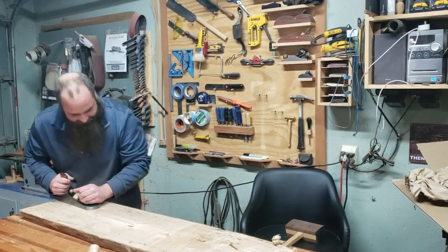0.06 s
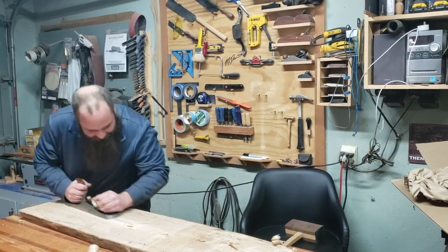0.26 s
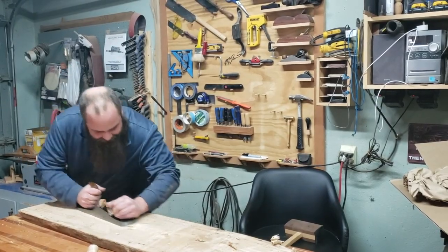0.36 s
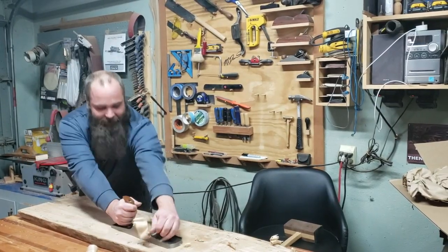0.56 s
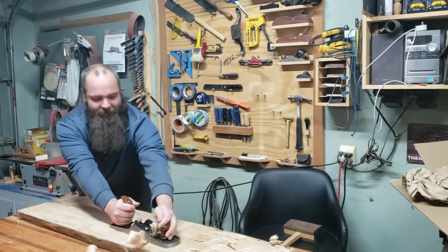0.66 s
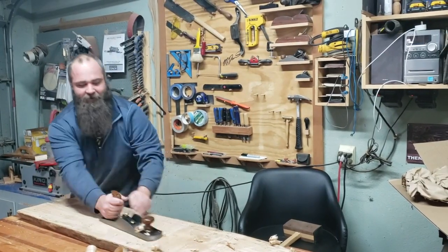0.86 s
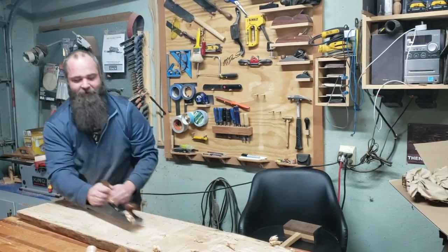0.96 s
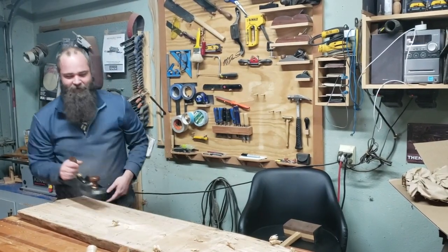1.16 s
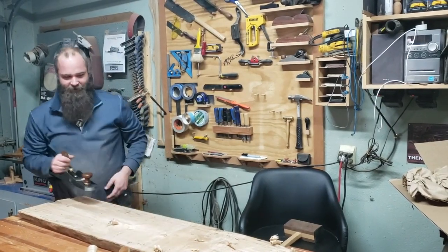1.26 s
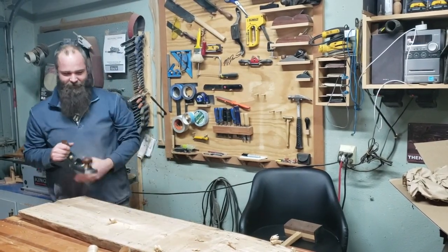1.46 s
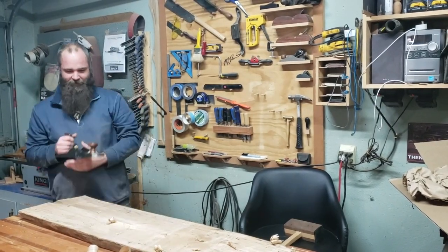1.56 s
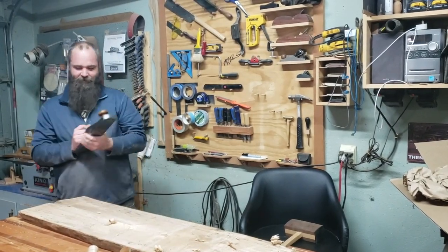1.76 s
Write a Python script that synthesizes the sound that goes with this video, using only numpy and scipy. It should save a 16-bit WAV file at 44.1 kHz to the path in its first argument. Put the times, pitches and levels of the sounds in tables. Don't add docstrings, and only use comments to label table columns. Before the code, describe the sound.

One quick shaving stroke of a hand plane on wood, hissing and speeding up, ends in a clunk; softer knocks and faint rubbing follow over a low fan hum, in stereo in a small room.

```python
import sys
import numpy as np
from scipy import signal
from scipy.fft import rfft, irfft, next_fast_len
from scipy.io import wavfile
from scipy.ndimage import map_coordinates

SR = 44100
rng = np.random.default_rng(int(sys.argv[2]) if len(sys.argv) > 2 else 0)


def amplitude_ratio(level_db):
    exponent = np.asarray(level_db, float) / 20
    return 10 ** exponent


def digitize_waveform(pressure):
    field = np.atleast_2d(pressure).T
    bounded = np.clip(field, -1, 1)
    quanta = np.round(bounded * 32767).astype(np.int16)
    wavfile.write(sys.argv[1], SR, quanta)


N = 79380
T = np.arange(N) / SR

# time in seconds, chatter rate in Hz, chatter level in dB,
# shaving hiss level in dB, sole rumble level in dB.
PLANE_STROKE = [
    (0, 193, -75.5, -96, -38),
    (0.059, 217.5, -42, -58, -35.5),
    (0.179, 299.4, -49, -38, -32.5),
    (.3, 343.1, -29.5, -22, -23),
    (.335, 761, -22, -20, -36),
    (.36, 960, -19, -21.5, -37),
    (.41, 1024, -13, -20.5, -38),
    (.45, 1600, -12.5, -24.5, -44.5),
    (0.477, 1758, -27.5, -24, -25),
]
# frequency in Hz, level in dB.
SHAVING_COLOUR = [(300, -32), (700, -5.5), (1500, -3), (2300, -5), (3300, -5.5), (5500, -11), (8500, -9),
                  (15800, -8.5)]
# frequency in Hz, level in dB.
SOLE_COLOUR = [(60, -34.5), (120, -15), (300, -4), (480, -3), (680, 4), (900, -5.5), (1500, -6),
               (4000, -32)]
# centre in Hz, width in Hz, level in dB.
BENCH_MODES = [(122.7, 4.9, -2.5), (170.3, 10, 0), (218, 22, -7.5), (254.5, 18, 1.5), (328.3, 17, -3),
               (1600, 38, -3.5), (468.4, 18, -19), (544.3, 13, -0.5), (816, 30, -17.5), (878, 42, -5.5),
               (944, 30, -15.5), (1236.7, 40, -2), (1423, 31, -13.5), (1834, 110, 0.5)]
# start in seconds, level in dB, contact length in seconds, rattle rate in Hz,
# looseness of that rate from 0 to 1.
THUMP_EVENTS = [(.09, -33, 0.048, 119.5, 0.1), (0.16, -27.5, 0.022, 596, 0.05),
                (0.52, -16, 0.054, 865, 0.13), (0.52, -16.5, .075, 545, .1), (.53, -24.5, 0.05, 150, .2),
                (.55, -18.5, 0.058, 246, 0.26), (.555, -18.5, 0.042, 950, .15), (.54, -19, .1, 400, .25),
                (0.63, -56, 0.019, 872, 0.17), (0.86, -26.5, 0.058, 122.5, 0.03),
                (0.83, -25, 0.049, 167.4, 0.14), (0.84, -37.5, 0.052, 943, .05),
                (.86, -28.5, 0.049, 450, 0.4), (.91, -27.5, 0.071, 123, 0.03), (.93, -26.5, 0.058, 165, .1),
                (0.702, -39.5, .1, 136, 0.15), (0.5, -21, .065, 1350, 0.3), (0, -38, 0.06, 158, 0.37),
                (0.918, -28.5, 0.048, 328, .06), (.925, -30, 0.091, 258, .05), (.927, -25, 0.016, 540, .08),
                (1.022, -31.5, 0.019, 550, 0.09), (1.015, -42, 0.058, 400, 0.2)]
# start in seconds, level in dB, swell in seconds, centre in Hz,
# breadth in octaves.
SCUFF_EVENTS = [(0.046, -41, 0.051, 3000, 1.7), (.505, -22.5, 0.026, 1900, 2.5),
                (.84, -48, 0.13, 720, 1.74), (0.83, -56.5, .05, 12000, 0.77),
                (1.14, -57.5, 0.051, 9000, 0.91), (0.7, -41, 0.011, 11000, 0.71),
                (0.74, -42.5, .05, 12500, 1.8), (0.7916, -42.5, 0.072, 1400, 4.8),
                (.35, -25.5, 0.05, 12000, 1.2), (1, -41.5, 0.046, 5200, 2.4),
                (1.045, -42.5, 0.025, 1250, 1.4), (1.0, -46, 0.061, 1060, 1.4),
                (1.22, -39.5, .022, 2350, 1.5), (1.3, -53.5, 0.0888, 6040, 1.95),
                (1.225, -53, .05, 420, 1.5), (1.337, -55, 0.036, 1020, 0.75),
                (1.47, -71.5, 0.0502, 1600, 0.027), (1.635, -46.5, 0.043, 2340, 0.73),
                (1.62, -52.5, 0.082, 860, 1.03), (1.679, -54.5, 0.013, 2900, 0.65),
                (1.71, -66.5, 0.026, 600, 1.1), (1.638, -51.5, 0.049, 8000, 1.7)]
# frequency in Hz, level in dB.
AIR_COLOUR = [(25, -23), (60, -14), (100, -24), (160, -31.5), (270, -30.5), (1000, -46.5), (4000, -47),
              (13000, -46.5)]
# frequency in Hz, time to fall 60 dB in seconds.
ROOM_DECAY = [(100, 0.58), (400, 0.42), (1500, 0.34), (5000, 0.38), (14000, 0.39)]
# frequency in Hz, level in dB.
ROOM_LEVEL = [(100, -5), (400, -4), (1000, -0.5), (3000, 4.85), (14000, -0.4)]
# frequency in Hz, level in dB.
DIRECT_LEVEL = [(100, -0.7), (400, 0.5), (1000, -2.5), (3000, -5), (14000, -4.5)]
# frequency in Hz, likeness from 0 to 1.
STEREO_LIKENESS = [(130, 0.94), (300, .85), (640, 0.37), (1400, .2), (3000, .01)]
# frequency in Hz, level in dB.
MICROPHONE_COLOUR = [(40, -1.5), (100, 6.22), (1000, 4.42), (4000, 1.3), (7500, -0.2), (9000, -7),
                     (11000, 1.25), (15000, 1.5)]

FADE_S = 0.0034
CHATTER_JITTER, CHATTER_SPREAD = 0.075, 0.3
LOOSE_DB, SCATTER_DB = -8, 5.5
IRON_HZ, IRON_WIDTH_HZ, OVERTONE_DB = 3160, 770, -7
TEAR_DB, GRIT_DB = 1.8, 4
BROAD_DB = -11
HUM_HZ, HUM_DB = 74.7, -51
HUM_DRIFT, HUM_SWAY_DB = 0.012, 1.8
AIR_DB = -63.5
LAG_S = 0.00012


def unit(x):
    return x / np.sqrt(np.mean(x ** 2) + 1e-20)


def along(points, hz):
    f, value = np.transpose(points)
    return np.interp(np.log(hz + 1), np.log(f + 1), value)


def wobble(rate):
    return map_coordinates(rng.standard_normal(N // 8), [T * rate])


def filtered(x, response):
    m = next_fast_len(N + SR)
    spectrum = rfft(x, m) * response(np.fft.rfftfreq(m, 1 / SR))
    return irfft(spectrum, m)[..., :N]


def noise(response):
    return unit(filtered(rng.standard_normal(N), response))


def gritty(response):
    grains = amplitude_ratio(GRIT_DB * wobble(1200)) * rng.standard_normal(N)
    return unit(filtered(grains, response))


def shaking(hz, loose, rate):
    return 2 * np.pi * np.cumsum(hz * (1 + loose * wobble(rate))) / SR


def release(end):
    return np.exp(-np.clip(T - end, 0, None) / FADE_S)


def resonance(f, centre, width):
    return 1j * f * width / (centre ** 2 - f * f + 1j * f * width)


def bench(force):
    def response(f):
        total = amplitude_ratio(BROAD_DB)
        for k, (centre, width, db) in enumerate(BENCH_MODES):
            total = total + (-1) ** k * amplitude_ratio(db) * resonance(f, centre, width)
        return total

    return amplitude_ratio(5) * filtered(force, response)


def plane():
    s, *columns = np.transpose(PLANE_STROKE)
    rate, chatter_db, hiss_db, rumble_db = [np.interp(T, s, column) for column in columns]
    on = release(s[-1])
    phase = shaking(rate, CHATTER_JITTER, 200)
    loose_phase = shaking(rate, CHATTER_SPREAD, 900)
    bites = np.sin(phase) + amplitude_ratio(LOOSE_DB) * np.sin(loose_phase)
    chatter = unit(amplitude_ratio(SCATTER_DB * wobble(121.52)) * bites)
    rumble = noise(lambda hz: amplitude_ratio(along(SOLE_COLOUR, hz)))
    wood = bench(on * (amplitude_ratio(chatter_db) * chatter + amplitude_ratio(rumble_db) * rumble))
    overtone = on * amplitude_ratio(chatter_db + OVERTONE_DB) * np.sin(2 * phase)
    iron = filtered(overtone, lambda f: resonance(f, IRON_HZ, IRON_WIDTH_HZ) ** 2)
    hiss = amplitude_ratio(TEAR_DB * wobble(45)) * gritty(lambda hz: amplitude_ratio(along(SHAVING_COLOUR, hz)))
    return iron + on * amplitude_ratio(hiss_db) * hiss + wood


def thumps():
    force = np.zeros(N)
    for start, db, length, hz, loose in THUMP_EVENTS:
        shove = np.clip((T - start) / FADE_S, 0, 1) * release(start + length)
        rattle = np.sin(shaking(hz, loose, hz / 2))
        force += amplitude_ratio(db + 3.1 * wobble(60)) * shove * rattle
    return bench(force)


def paired(pair):
    def shares(hz):
        turn = np.arccos(np.clip(along(STEREO_LIKENESS, hz), -1, 1)) / 2
        return np.array([np.cos(turn), np.sin(turn)])

    mid, side = filtered(pair, shares)
    return np.array([mid + side, mid - side])


def fan():
    phase = shaking(HUM_HZ, HUM_DRIFT, 12)
    hum = np.sin(phase) * amplitude_ratio(HUM_DB + HUM_SWAY_DB * wobble(21))
    air = [noise(lambda hz: amplitude_ratio(along(AIR_COLOUR, hz))) for side in "LR"]
    return hum + amplitude_ratio(AIR_DB) * paired(np.array(air))


def scuffs():
    total = np.zeros(N)
    for start, db, length, centre, octaves in SCUFF_EVENTS:
        swell = np.sin(np.pi / 2 * np.clip((T - start) / length, 0, 1)) * release(start + length)
        rub = gritty(lambda f: np.exp(-(np.log2((f + 1) / centre) / octaves) ** 2))
        total += amplitude_ratio(db) * swell * rub
    return total


def workshop(x):
    length = SR * 2 // 3
    hz, t, z = signal.stft(rng.standard_normal((2, length)), SR, nperseg=256)
    decay_db = -60 * t / along(ROOM_DECAY, hz)[:, None]
    energy = np.linalg.norm(amplitude_ratio(decay_db), axis=1)[:, None]
    z = z * amplitude_ratio(decay_db + along(ROOM_LEVEL, hz)[:, None]) / energy
    tail = paired(signal.istft(z, SR, nperseg=256)[1])[:, :length] / np.sqrt(128)
    delayed = np.pad(x, (150, 0))
    wet = signal.fftconvolve(delayed[None], tail, axes=1)[:, :N]
    sides = np.array([[1], [-1]])
    direct = filtered(x, lambda f: amplitude_ratio(along(DIRECT_LEVEL, f)) * np.exp(1j * np.pi * f * LAG_S * sides))
    return wet + direct


def scene():
    return workshop(plane() + thumps() + scuffs()) + fan()


def top_cut(x):
    return signal.sosfilt(signal.butter(12, 16790, fs=SR, output="sos"), x)


def record(dry):
    top_hz = 15830
    mix = filtered(dry, lambda hz: amplitude_ratio(along(MICROPHONE_COLOUR, hz)) * (hz < top_hz))
    return top_cut(mix)


dry = scene()
out = record(dry)
digitize_waveform(out)
```